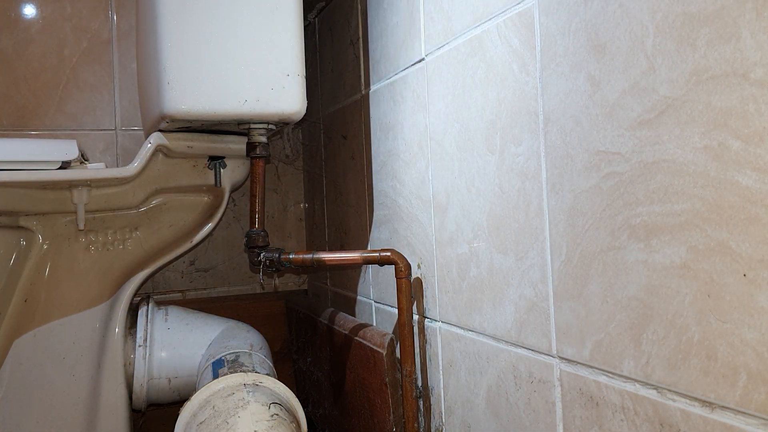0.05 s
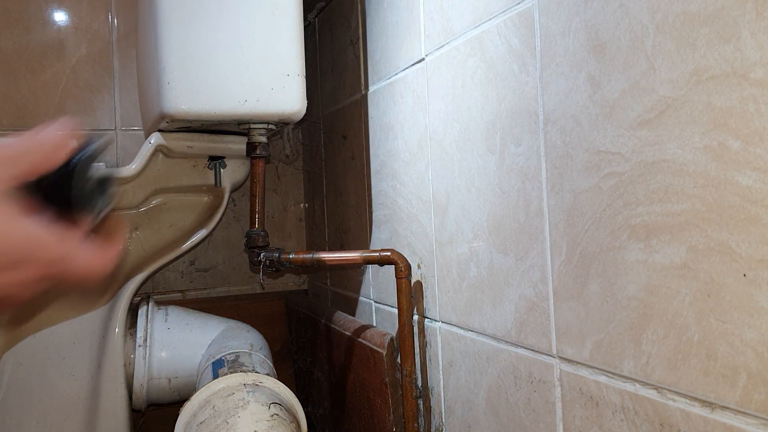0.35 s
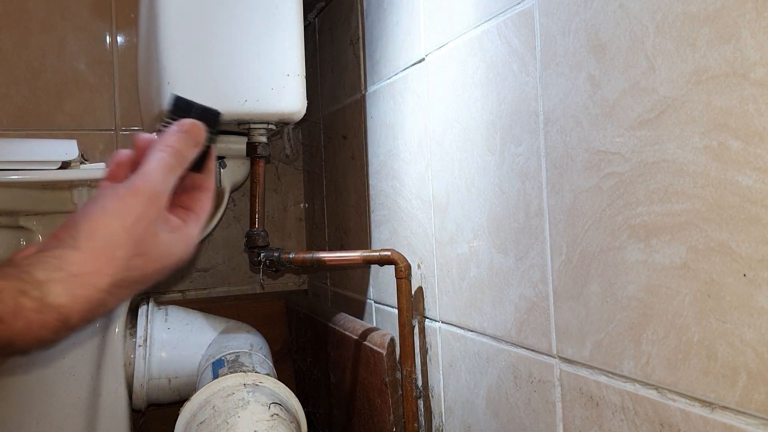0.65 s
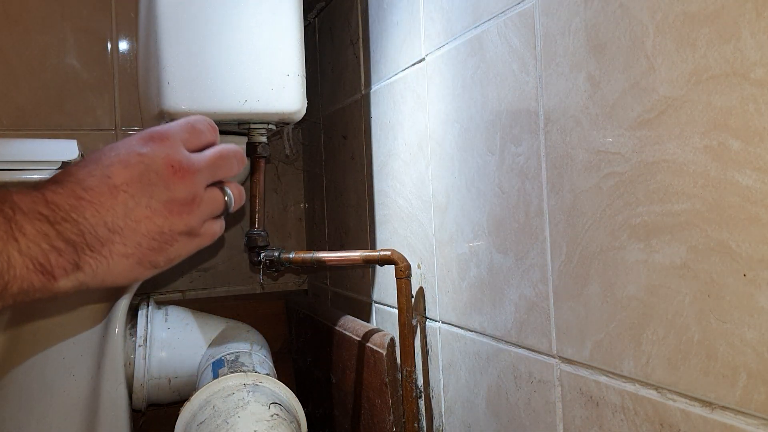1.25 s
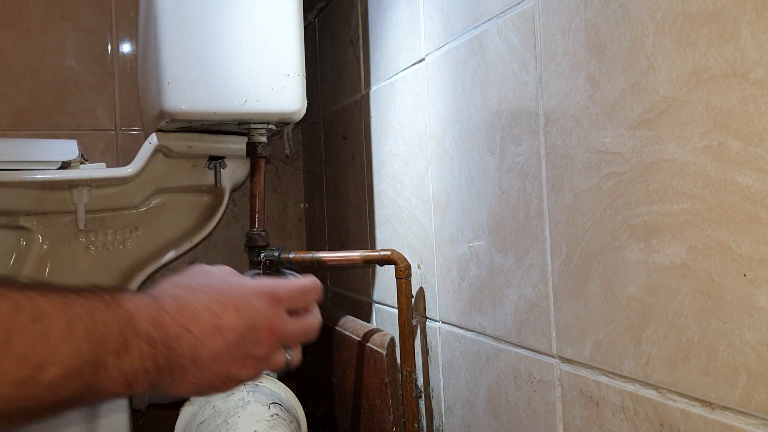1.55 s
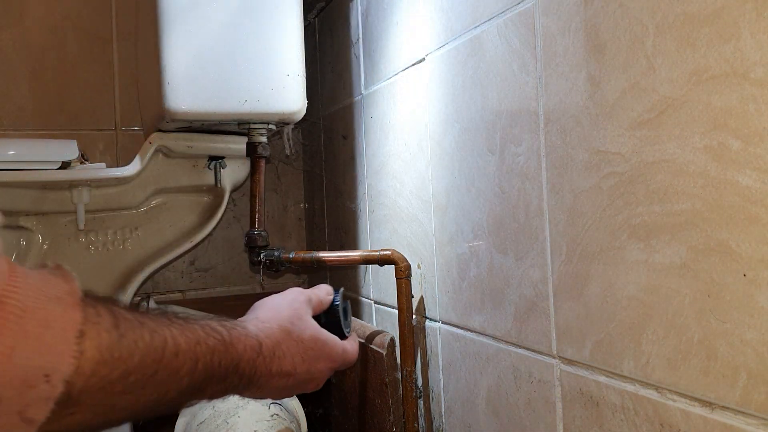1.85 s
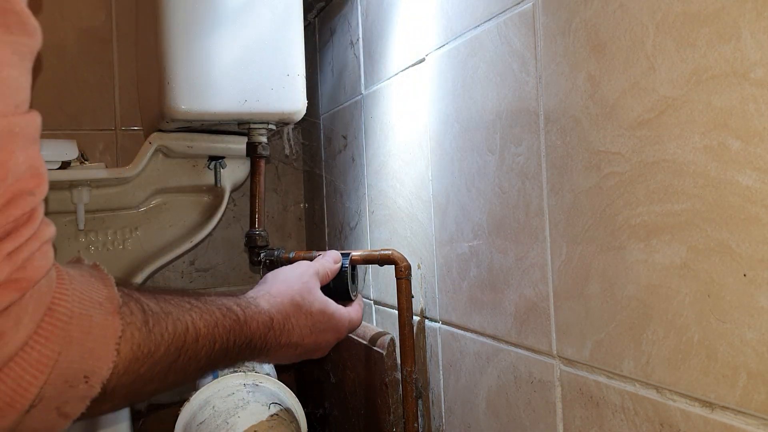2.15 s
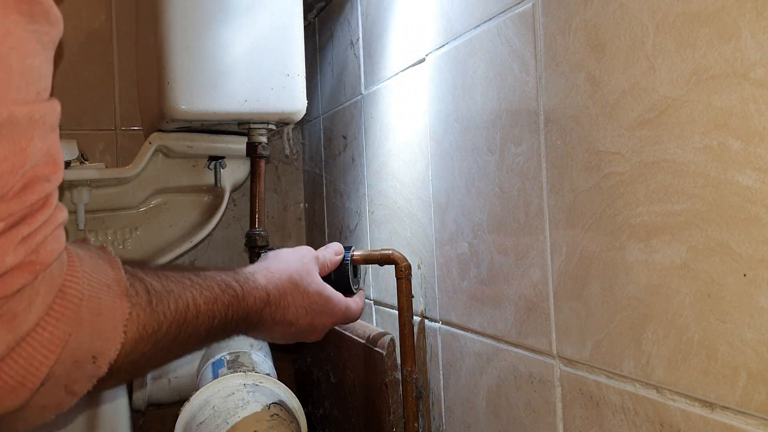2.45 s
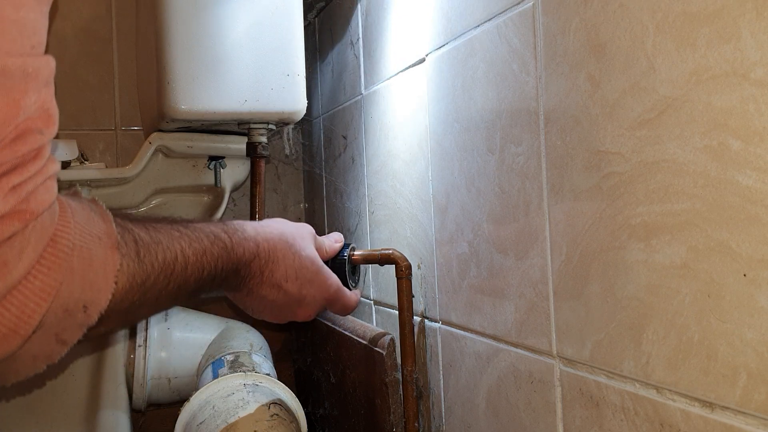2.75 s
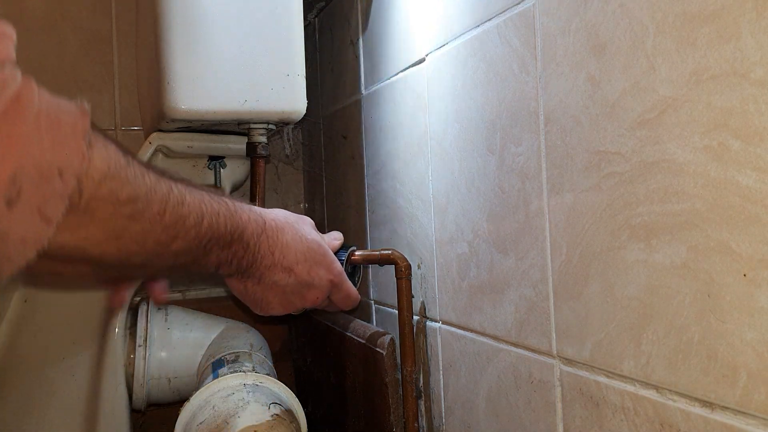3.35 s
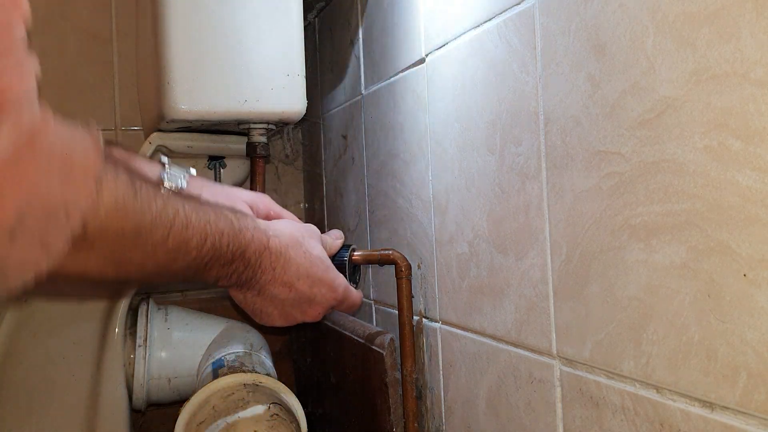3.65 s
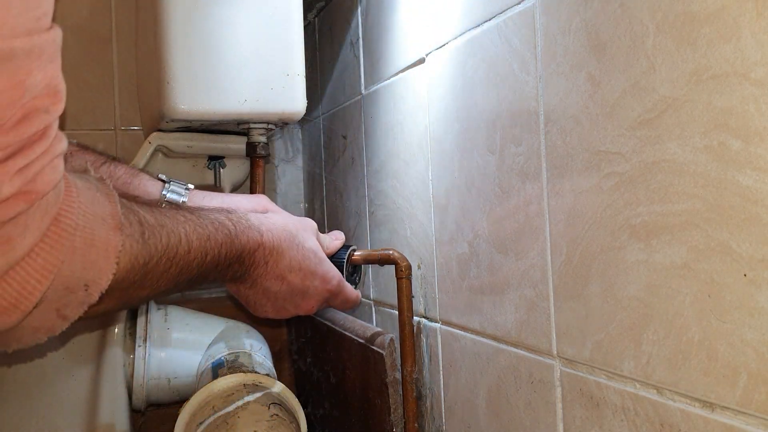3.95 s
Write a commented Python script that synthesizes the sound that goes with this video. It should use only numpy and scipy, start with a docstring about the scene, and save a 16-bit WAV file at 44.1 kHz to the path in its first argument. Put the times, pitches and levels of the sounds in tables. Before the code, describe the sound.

A small pipe cutter clinks lightly, knocks against a copper pipe and snaps on with a dull thud, then turns with a short rasp. A microphone pair catches tiled bathroom reflections, low hum and faint sleeve rustle.

```python
"""Pipe cutter in a tiled bathroom

A pair of microphones hears a small cutter clink on a fitting, knock against a copper pipe and snap on
with a thud of the pipework. Each contact rings the metal, and the tiles throw it back. As the cutter
turns, its wheel rasps and slips. Underneath: room air, mains hum, a faint whine, a sleeve, hand scuffs."""
import sys
import numpy as np
from scipy import signal
from scipy.fft import rfft, irfft
from scipy.io import wavfile
from scipy.ndimage import uniform_filter1d

SR = 44100
rng = np.random.default_rng(int(sys.argv[2]) if len(sys.argv) > 2 else 0)


def output_pcm(signal):
    """Save a mono or channel-first signal as 16-bit PCM at the path in sys.argv[1].

    Samples are clipped to [-1, 1] before scaling.
    """
    pcm = np.clip(np.atleast_2d(signal).T, -1, 1) * 32767
    wavfile.write(sys.argv[1], SR, np.round(pcm).astype(np.int16))


N = 176400
TIME = np.arange(N) / SR

# The tiled room's decay. Each row: frequency in Hz, t60 in seconds.
ROOM_DECAY = [(100, 0.49), (400, 0.33), (1000, 0.29), (2500, 0.21), (5000, 0.21), (9000, 0.21),
              (16000, 0.16)]
# How alike the two microphones are in diffuse sound. Each row: frequency in Hz, correlation.
MIC_LIKENESS = [(100, 0.97), (170, 0.82), (300, 0.42), (700, 0.36), (1500, 0), (16000, 0.072)]
# The lean of the pair. Each row: frequency in Hz, left minus right in dB.
MIC_BALANCE = [(60, -1), (110, -2.5), (250, 0.5), (700, -1.5), (1300, -1), (2400, 0), (4400, 1), (8000, -3),
               (15000, -3.5)]

# Spectra of the room air, the cloth and each kind of metal contact.
# Each row: frequency in Hz, relative spectral density in dB.
AIR_SPECTRUM = [(20, -33.5), (35, -22), (50, -11), (62, -3), (72, -2.5), (83, 4), (97, 6.5), (110, -3),
                (150, -13), (190, -17.5), (320, -31), (400, -24.5), (460, -27), (630, -26), (675, -19.5),
                (770, -39), (845, -27), (900, -33), (1300, -49.5), (1650, -36), (2000, -55), (3000, -49),
                (5000, -57), (6600, -45), (7700, -60), (11000, -58), (16000, -70)]
SLEEVE_SPECTRUM = [(200, 9), (900, 0), (4000, -3), (6600, -5), (7800, -13), (11000, -14), (16000, -18.5)]
CLINK_SPECTRUM = [(300, -6), (1200, -11), (2400, 3), (3800, 1), (5100, -4), (6700, -4), (7600, -17),
                  (10300, -7), (12500, -13), (16000, -26)]
KNOCK_SPECTRUM = [(100, -1), (400, -10), (650, 3.5), (880, 1.5), (1250, -5.5), (1800, -2.5), (2300, -6),
                  (2800, 3.5), (4000, -8.5), (5400, -16), (8000, -16), (12000, -23), (16000, -46)]
CLICK_SPECTRUM = [(400, -6), (1500, -8.5), (2100, -12.5), (3000, -7.5), (3600, 2.5), (4600, 3), (5300, -15),
                  (6800, -17), (8000, -23), (16000, -27)]
SNAP_SPECTRUM = [(30, -34), (130, 5), (420, -3), (970, 10), (1400, -4.5), (2700, -4), (3300, -7.5),
                 (4500, -10), (7000, -19), (9700, -23.5), (11400, -14), (13500, -16), (16000, -34)]
RASP_SPECTRUM = [(25, -20), (80, 9.5), (200, 1), (330, -2.5), (470, 1), (750, 1.5), (1000, 2), (1300, 0),
                 (2000, 1), (2800, -1), (4000, -6), (5500, -8.5), (6800, -9.5), (8200, -16), (12000, -17.5),
                 (16000, -20)]

# A faint whine in the room. Each row: time in seconds, pitch in Hz, level in dB.
WHINE_PATH = [(0, 511.7, -57), (.45, 522, -56), (.8, 515, -60), (1.15, 519.4, -56), (1.75, 520.4, -60),
              (2.18, 514.6, -50.5), (2.4, 508, -64), (3, 502, -75)]
# The sleeve's rustle. Each row: time in seconds, level in dB.
SLEEVE_LEVEL = [(0, -54.5), (.22, -59.5), (.3, -57), (.52, -57.5), (.63, -55), (.85, -61.5), (1.1, -72.5),
                (1.28, -74), (1.45, -63), (1.65, -66), (1.85, -59), (2.19, -59), (2.5, -90), (3.14, -67.5),
                (3.22, -49), (3.36, -50.5), (3.75, -45.5), (3.85, -55.5), (4, -71.5)]
# The cutter in the hand. Each row: middle and half length in seconds, band centre in Hz, level in dB.
HAND_SCUFFS = [(0.008, 0.033, 2480, -56.5), (0.633, .06, 2270, -62), (1.36, 0.1, 3080, -72)]
# Pipework swaying on its clips. Each row: start in seconds, pitch in Hz, level in dB, t60 in seconds.
PIPE_THUDS = [(2.228, 148.6, -38, 0.36), (2.299, 142.8, -35.5, 0.96), (2.384, 142.5, -31, 0.31),
              (2.894, 124.3, -17.5, 0.25), (2.974, 133.4, -26.5, 0.36), (3.471, 124, -41, 0.29),
              (3.668, 191, -18, 0.073), (3.674, 115.7, -22, 0.079), (3.688, 66, -19, 0.2)]

# How the metal parts ring. Each row: frequency in Hz, relative level in dB, t60 in seconds.
FITTING_MODES = [(2288, -24, .025), (4870, -4, .025), (4958, -4, .08), (5120, 0, .02), (5335, -9, .06),
                 (6465, -16, .05), (6578, -22, .08), (9930, -13, .03), (10050, -18, .05), (13100, -22, .07),
                 (13200, -23, .06), (15400, -29, .04)]
PIPE_MODES = [(785, -2, .05), (847, 1, .12), (925, 1, .045), (1000, 0, .045), (1071, 0, .07),
              (1410, -7, .055), (1523, -11, .1), (1775, 2, .06), (2210, -9, .055), (2620, -1, .045),
              (2912, -4, .07), (3332, -16, .1), (5330, -10, .045), (5690, -13, .045), (7537, -9, .035),
              (10010, -15, .06), (11680, -22, .05), (15070, -25, .07)]
WHEEL_MODES = [(1364, -1, 0.094), (2610, 1, .05), (3680, 7, 0.016), (4150, -3.5, 0.014), (4360, 0, .02),
               (6540, -8, 0.082)]
JAW_MODES = [(297, -1, .12), (624, -2, .07), (675, 4, .04), (851, -3, .12), (965, 3, .09), (1090, -2, .11),
             (1640, -13, .06), (2300, -3, .07), (2740, 0, .05)]
GRIPPED_PIPE_MODES = [(389, -5, .3), (463, 4, .35), (619, -1, .25), (699, 0, .25), (960, 1, .15),
                      (1468, -2, .25), (1684, -1, .25), (2370, -2, .2), (2762, 3, .15)]

# Metal on metal. Each row: start in seconds, level in dB, tilt in dB per octave, contact time in seconds.
FITTING_CLINKS = [(.9462, -33, -2, 0.00068), (.956, -42, -4, 0.0038), (1.255, -54, -16, .0012)]  # light taps on the fitting
# Knocks of the cutter against the pipe; the last row is a soft brushing scuff.
PIPE_CONTACTS = [(2.2062, -17, 0.5, 0.0049), (2.2112, -25.5, -1.5, 0.0044), (2.243, -32.5, -11.5, 0.0032),
                 (2.306, -32.5, -2, 0.0066), (2.376, -41.5, -2.5, .0034), (3.042, -43, -14.5, 0.0044),
                 (3.052, -40.5, -12, 0.0024), (3.305, -45, 0.5, 0.02)]
WHEEL_CLICKS = [(.873, -56, 3.5, .0013), (2.308, -41.5, 7, 0.0037), (2.346, -51.5, 6, 0.0093),
                (2.3765, -28.5, 0.5, 0.0015)]  # the wheel in its housing; the first row is a faint tick of the sleeve
JAW_SNAPS = [(2.873, -34, 1, 0.0053), (2.879, -36.5, 3, 0.0033), (2.8835, -21, 2.5, 0.0038),
             (2.8885, -24.5, -2, 0.0012), (2.8935, -28.5, -5, 0.0032), (2.899, -33, -6.5, 0.0048),
             (2.955, -40, -3, 0.02)]  # the jaws close over the pipe
WHEEL_SLIPS = [(3.48, -26, -1.5, 0.0062), (3.5005, -23, 2, 0.0058), (3.5655, -24, -1, 0.0049),
               (3.6125, -23, 0, 0.0017), (3.643, -20.5, -0.5, 0.0026)]  # the wheel catches and slips
# The scrape of turning the cutter. Each row: time in seconds, level in dB, tilt in dB per octave.
CUTTER_TURN = [(3.37, -61, -2), (3.43, -40, 1.5), (3.47, -32.5, 0.5), (3.495, -27, 1), (3.545, -34.5, 2.2),
               (3.58, -27, -0.5), (3.605, -33, -0.5), (3.635, -28.5, -1.5), (3.665, -34, 0.5),
               (3.695, -31.5, -23), (3.73, -68, -17)]

GRAINS_PER_S = 2400  # friction, in the hand and on the copper
KNOCK_LAG_S, RASP_LAG_S = 0.00015, -0.000287  # left microphone behind right


def amp(db):
    """Decibels to gain."""
    return 10 ** (np.asarray(db) / 20)


def unit_rms(x):
    """Scales to rms 1."""
    return x / np.sqrt(np.mean(x ** 2) + 1e-20)


def unit_energy(x):
    """Scales to energy 1."""
    return x / np.sqrt(np.sum(x ** 2, -1, keepdims=True) + 1e-20)


def at_hz(points, hz):
    """Reads a table on a log-frequency axis."""
    table_hz, value = np.transpose(points)
    return np.interp(np.log(hz + 1), np.log(table_hz + 1), value)


def curve(rows, column=1):
    """One column of a control table at every sample."""
    rows = np.array(rows)
    return np.interp(TIME, rows[:, 0], rows[:, column])


def add(mix, start_s, sound):
    """Mixes a sound in at its start time."""
    part = mix[round(start_s * SR):][:len(sound)]
    part += sound[:len(part)]


def octaves(hz):
    """Octaves above 2 kHz, flat in the bass."""
    return np.log2(np.maximum(hz, 400) / 2000)


def minimum_phase(log_gain):
    """The spectrum with this gain whose energy comes earliest."""
    return np.exp(np.conj(signal.hilbert(log_gain)))


def flattened(response, width_hz=60):
    """Evens out the broad peaks and dips of a response, keeping its onset."""
    spectrum = np.fft.fft(response)
    bins = max(1, round(width_hz * response.shape[-1] / SR))
    power = uniform_filter1d(abs(spectrum) ** 2, bins, mode="wrap")
    return np.fft.ifft(spectrum / minimum_phase(np.log(abs(power) + 1e-12) / 2)).real


def wander(hz):
    """Slow random drift of rms 1, up to the given rate."""
    rolloff = 1 + (np.fft.rfftfreq(N, 1 / SR) / hz) ** 4
    return unit_rms(irfft(rfft(rng.standard_normal(N)) / rolloff, N))


def paired(x):
    """Makes two unrelated channels alike in the bass, as at a pair of microphones."""
    size = x.shape[1]
    left, other = rfft(x)
    likeness = np.clip(at_hz(MIC_LIKENESS, np.fft.rfftfreq(size, 1 / SR)), -1, 1)
    right = likeness * left + np.sqrt(1 - likeness ** 2) * other
    return irfft(np.array([left, right]), size)


def diffuse_noise(spectrum):
    """Coloured noise of rms 1 from all round the microphones."""
    white = paired(rng.standard_normal((2, N)))
    gain = amp(at_hz(spectrum, np.fft.rfftfreq(N, 1 / SR)))
    return unit_rms(irfft(rfft(white) * gain, N))


def bathroom(x, lag_s, wet_db, build_s=0.0019, early_db=14, early_s=0.0042):
    """Direct sound at the two microphones, then dense reflections from the tiles."""
    t = np.arange(SR * 3 // 4) / SR
    echoes = paired(rng.standard_normal((2, len(t))) * (rng.random((2, len(t))) < .2))
    hz, frame_s, frames = signal.stft(echoes, SR, nperseg=256)
    decay = amp(-60 * frame_s / at_hz(ROOM_DECAY, hz)[:, None])
    tail = signal.istft(frames * decay, SR, nperseg=256)[1][:, :len(t)]
    build = 1 - np.exp(-(t / build_s) ** 2)
    early_lift = 1 + amp(early_db) * np.exp(-t / early_s)
    tail = unit_energy(tail * build * early_lift)
    direct = np.exp(-1j * np.pi * np.fft.rfftfreq(N, 1 / SR) * np.array([[lag_s], [-lag_s]]))
    response = flattened(irfft(direct + amp(wet_db) * rfft(tail, N), N))
    return irfft(rfft(x) * rfft(response), N)


def room_tone(air_db=-41, hum_hz=99.7, hum_db=-37):
    """The room by itself: rumbling air, a wavering mains hum and a thin whine."""
    air = amp(air_db) * diffuse_noise(AIR_SPECTRUM)
    hum_waver = 1 + 0.22 * wander(hz=23)
    hum = unit_rms(hum_waver * np.sin(2 * np.pi * hum_hz * TIME + 0.21 * wander(hz=2.16)))
    whine_phase = 2 * np.pi * np.cumsum(curve(WHINE_PATH)) / SR
    whine_waver = 1 + 0.4 * wander(hz=7.4)
    whine = unit_rms(whine_waver * np.sin(whine_phase + 0.17 * wander(hz=11)))
    return air + amp(hum_db) * hum + amp(curve(WHINE_PATH, column=2)) * whine


def sleeve(flutter_db=0.63):
    """Cloth brushes as the arm moves."""
    return diffuse_noise(SLEEVE_SPECTRUM) * amp(curve(SLEEVE_LEVEL) + flutter_db * wander(hz=25))


def hand_scuffs():
    """The cutter shifts in the hand: a band of fine friction grains that swells and fades."""
    out = np.zeros(N)
    for middle_s, half_s, hz, db in HAND_SCUFFS:
        grit = rng.standard_normal(N) * (rng.random(N) < GRAINS_PER_S / SR)
        band = signal.iirpeak(hz, Q=2.1, fs=SR)
        grit = signal.lfilter(*band, signal.lfilter(*band, grit))
        swell = np.exp(-((TIME - middle_s) / half_s) ** 2)
        out += amp(db) * unit_rms(grit) * swell
    return bathroom(out, KNOCK_LAG_S, wet_db=13)


def pipework_thuds(rise_s=0.0022):
    """Low, damped swings of the pipework, the same at both microphones."""
    out, t = np.zeros(N), np.arange(SR // 2) / SR
    rise = 1 - np.exp(-t / rise_s)
    for start_s, hz, db, t60 in PIPE_THUDS:
        add(out, start_s, amp(db - 60 * t / t60) * rise * np.sin(2 * np.pi * hz * t))
    return out


def metal_response(spectrum, modes, ring_db, tilt=0, size=16384):
    """A metal part's answer to one impulse: a coloured crack and its ringing modes."""
    hz, t = abs(np.fft.fftfreq(size, 1 / SR)), np.arange(size) / SR
    crack = np.fft.ifft(minimum_phase(np.log(amp(at_hz(spectrum, hz))))).real
    ring = sum(amp(db - 60 * t / t60) * np.sin(2 * np.pi * (mode_hz * t + rng.random()))
               for mode_hz, db, t60 in modes)
    struck = unit_energy(crack) + amp(ring_db) * unit_energy(ring)
    slope = minimum_phase(np.log(amp(tilt * octaves(hz))))
    return unit_energy(np.fft.ifft(np.fft.fft(struck) * slope).real)


def chatter(contact_s, size=4096):
    """A brief chatter of metal on metal, even in spectrum."""
    decay = np.exp(-np.arange(size) / SR / contact_s)
    return unit_energy(flattened(rng.standard_normal(size) * decay))


def blows(contacts, spectrum, modes, ring_db):
    """Each contact rings the part; its level is its energy as rms over a hundredth of a second."""
    out = np.zeros(N)
    for start_s, db, tilt, contact_s in contacts:
        blow = signal.fftconvolve(chatter(contact_s), metal_response(spectrum, modes, ring_db, tilt))
        add(out, start_s, amp(db) * unit_energy(blow))
    return out * np.sqrt(SR / 100)


def cutter_going_on():
    """The cutter clinks, knocks, clicks and snaps onto the pipe; a soft brushing scuff follows."""
    parts = [blows(FITTING_CLINKS, CLINK_SPECTRUM, FITTING_MODES, ring_db=8),
             blows(PIPE_CONTACTS, KNOCK_SPECTRUM, PIPE_MODES, ring_db=6.5),
             blows(WHEEL_CLICKS, CLICK_SPECTRUM, WHEEL_MODES, ring_db=-10.5),
             blows(JAW_SNAPS, SNAP_SPECTRUM, JAW_MODES, ring_db=-5.5)]
    return sum(bathroom(part, KNOCK_LAG_S, wet_db) for part, wet_db in zip(parts, (5, 2.5, 0.5, 9.5)))


def cutter_rasp(grain_spread_db=3):
    """The wheel scrapes round the copper: dense grains that dull as it slows, and a few sharp slips."""
    sizes = amp(grain_spread_db * np.minimum(rng.exponential(1, N), 4))
    grains = sizes * rng.choice([-1, 1], N) * (rng.random(N) < GRAINS_PER_S / SR)
    pipe = metal_response(RASP_SPECTRUM, GRIPPED_PIPE_MODES, ring_db=-8)
    scrape = signal.fftconvolve(grains, pipe)[:N]
    hz, frame_s, frames = signal.stft(scrape, SR, nperseg=256)
    tilt = np.interp(frame_s, TIME, curve(CUTTER_TURN, column=2))
    slope = amp(octaves(hz)[:, None] * tilt)
    power = np.mean(abs(frames) ** 2, 1, keepdims=True)
    tilted_rms = np.sqrt((power * slope ** 2).sum(0))  # divided out, so tilt moves only the brightness
    scrape = unit_rms(signal.istft(frames * slope / tilted_rms, SR, nperseg=256)[1][:N])
    turning = (TIME > CUTTER_TURN[0][0]) & (TIME < CUTTER_TURN[-1][0])
    rasp = bathroom(scrape * turning * amp(curve(CUTTER_TURN)), RASP_LAG_S, wet_db=7.5)
    slips = blows(WHEEL_SLIPS, RASP_SPECTRUM, GRIPPED_PIPE_MODES, ring_db=-14)
    return rasp + bathroom(slips, RASP_LAG_S, wet_db=-1)


def scene():
    """Everything that reaches the microphones in the bathroom."""
    return cutter_going_on() + cutter_rasp() + pipework_thuds() + sleeve() + hand_scuffs() + room_tone()


def record(dry, edge_hz=15950):
    """The microphone pair leans left or right by frequency, and the top treble is cut off."""
    lean_db = at_hz(MIC_BALANCE, np.fft.rfftfreq(N, 1 / SR))
    heard = irfft(rfft(dry) * amp(np.array([lean_db, -lean_db]) / 2), N)
    lowpass = signal.firwin(511, edge_hz, window=("kaiser", 9), fs=SR)
    return signal.oaconvolve(heard, lowpass[None], "same")


dry = scene()
out = record(dry)
output_pcm(out)
```